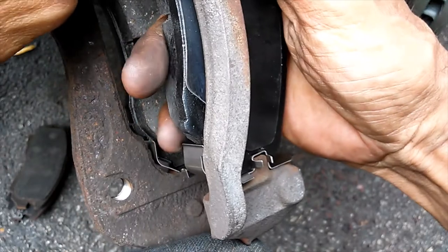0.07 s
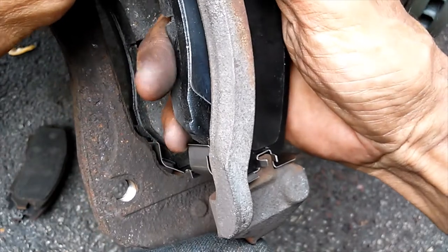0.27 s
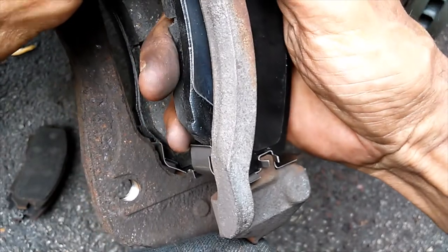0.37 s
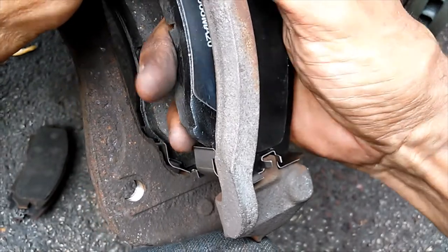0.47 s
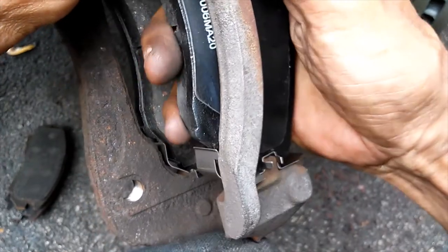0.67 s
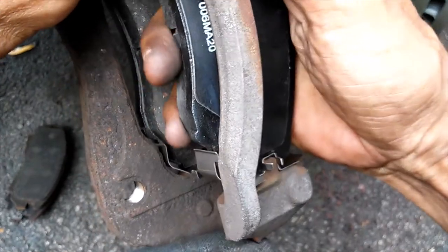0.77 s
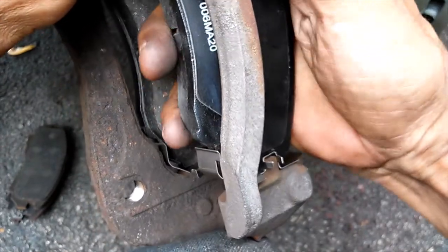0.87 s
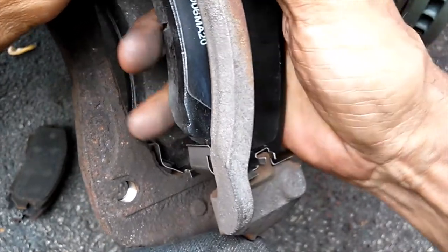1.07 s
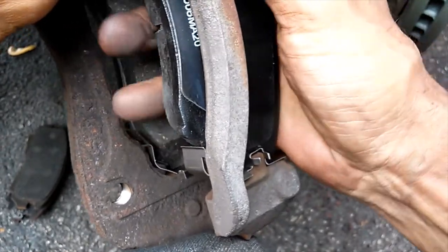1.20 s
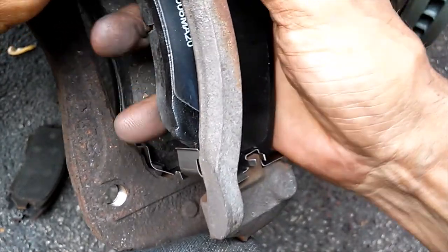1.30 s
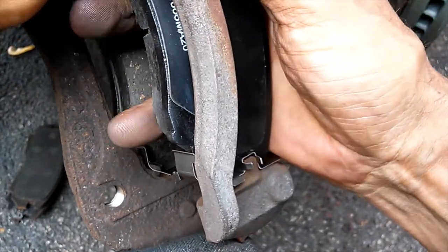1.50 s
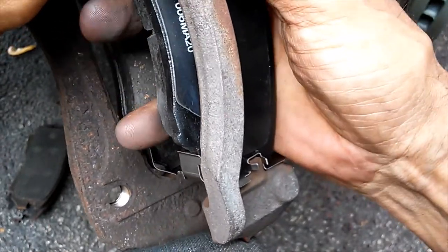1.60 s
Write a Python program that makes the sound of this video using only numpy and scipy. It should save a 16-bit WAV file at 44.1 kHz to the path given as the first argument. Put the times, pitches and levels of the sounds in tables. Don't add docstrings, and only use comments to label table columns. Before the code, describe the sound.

Steel brake pad snapping into a bracket's clips, two bright clacks over low traffic rumble

```python
import sys
import numpy as np
from scipy import signal
from scipy.fft import rfft, irfft, next_fast_len
from scipy.io import wavfile
from scipy.ndimage import uniform_filter1d, map_coordinates

SR = 44100
rng = np.random.default_rng(int(sys.argv[2]) if len(sys.argv) > 2 else 0)


def nominal_scale(level):
    x = np.asarray(level, float) / 20
    return 10 ** x


def bounce(signal):
    frames = np.transpose(np.atleast_2d(signal))
    limited = np.clip(frames, -1, 1)
    pcm = np.round(limited * 32767).astype(np.int16)
    wavfile.write(sys.argv[1], SR, pcm)


N = 72765


def unit(x):
    return x / np.sqrt(np.mean(x ** 2) + 1e-20)


def along(points, hz):
    f, v = np.transpose(points)
    return np.interp(np.log(hz + 1), np.log(f + 1), v)


def curves(rows):
    s, *cols = np.transpose(rows)
    return [np.interp(np.arange(N) / SR, s, c) for c in cols]


def wobble(rate_hz):
    knots = rng.standard_normal(int(N * rate_hz / SR) + 4)
    return map_coordinates(knots, [np.arange(N) * rate_hz / SR])


def filtered(x, response):
    m = next_fast_len(N + SR // 2)
    return irfft(rfft(x, m) * response(np.fft.rfftfreq(m, 1 / SR)), m)[..., :N]


def noise(spectrum):
    return unit(filtered(rng.standard_normal(N), lambda hz: nominal_scale(along(spectrum, hz))))


def patchy(spectrum, patch_db, size):
    z = signal.stft(noise(spectrum), nperseg=size)[2]
    field = uniform_filter1d(rng.standard_normal(z.shape), size=2, axis=0)
    field = uniform_filter1d(field, size=5, axis=1)
    return unit(signal.istft(z * nominal_scale(patch_db * unit(field)), nperseg=size)[1][:N])


def bump(start_s, rise_s, fall_s):
    t = np.arange(N) / SR - start_s
    rise = np.sin(np.pi / 2 * np.clip(t / rise_s, 0, 1)) ** 2
    return rise * nominal_scale(-20 * np.maximum(t - rise_s, 0) / fall_s)


def background():
    # time_s, level_db
    rumble_level = [
        (0.0, -47.5),
        (1.194, -44.5),
        (1.65, -46.5),
    ]
    # freq_hz, density_db_per_hz
    rumble_spectrum = [(12, -55.5), (20, -30), (35, -7), (54, 5), (70, 3), (119, -9.5), (269, -21),
                       (305, -26.5), (420, -30.5), (550, -68.5), (920, -120)]
    # freq_hz, density_db_per_hz
    air_spectrum = [(180, -24), (300, -7.5), (830, -9.5), (903, -12.5), (2900, -21), (4710, -19.5),
                    (14400, -27.5), (15800, -23), (15950, -70)]
    level_db, = curves(rumble_level)
    rumble = nominal_scale(level_db + 3 + 2.0 * wobble(18)) * noise(rumble_spectrum)
    hiss = nominal_scale(-62.5 + 2.7 * wobble(13)) * patchy(air_spectrum, patch_db=2.5, size=256)
    return rumble + hiss


def murmur():
    # freq_hz, density_db_per_hz
    street_spectrum = [(200, -44), (300, -1), (1000, -3), (1300, -19), (1800, -60)]
    return nominal_scale(-68.5) * patchy(street_spectrum, patch_db=6.5, size=1024)


def thumps():
    # start_s, pitch_hz, peak_db, rise_s, t60_s
    knocks = [(0.003, 1018, -62, 0.025, 0.42), (.555, 2450, -79, .03, .4), (.72, 409, -55, 0.026, 0.21),
              (1.346, 1765, -55.5, 0.0036, 0.043), (.68, 554, -52, 0.018, 0.092),
              (.453, 2283, -35, 0.0063, 0.15), (.457, 727, -43.5, 0.0027, .04),
              (.5, 2182, -61, 0.018, 0.14), (1.025, 2340, -59, .01, .07), (1.04, 6200, -58, .012, .07),
              (.12, 63.8, -38.5, 0.036, .2), (.24, 76, -35, .03, .2), (.46, 61.5, -38.5, 0.023, 0.14),
              (.655, 58.5, -32.5, 0.027, 0.12), (.86, 67.9, -36.5, 0.035, .25),
              (1.022, 64.8, -29, 0.016, 0.3), (1.233, 71.7, -27.5, 0.015, 0.27),
              (1.2986, 95, -19, 0.0038, 0.064), (1.311, 96, -16.5, 0.0033, 0.054),
              (1.341, 79.2, -19, 0.006, 0.08), (1.344, 724, -49.5, 0.0031, 0.046)]
    t = np.arange(N) / SR
    out = np.zeros(N)
    for s, hz, db, rise_s, t60_s in knocks:
        out -= nominal_scale(db) * bump(s, rise_s, t60_s / 3) * np.sin(2 * np.pi * hz * (t - s))
    return out


def chatter(contacts, body, crack, modes, body_db, blow_db, crack_db, struck_db, ring_db, wide, band_hz):
    contact_rise_s, contact_t60_s, struck_t60_s, ring_scatter_db = 0.00017, .011, 0.013, 2.5
    life = np.arange(SR // 4) / SR
    rise = 1 - np.exp(-life / contact_rise_s)
    power, out, blows = np.zeros((3, N))
    sway = [0.99 * wobble(150)[:len(life)] for _ in modes]
    for s, db, struck_hz in contacts:
        start = round(s * SR)
        here = slice(start, start + len(life))
        blows[start] = nominal_scale(db + blow_db)
        power[here] += (rise * nominal_scale(db - 60 * life / contact_t60_s)) ** 2
        struck = rise * nominal_scale(db + struck_db - 60 * life / struck_t60_s)
        out[here] += struck * np.sin(2 * np.pi * struck_hz * life)
        for (hz, mode_db, t60_s), turn in zip(modes, sway):
            peak_db = db + ring_db + mode_db + rng.normal(0, ring_scatter_db)
            out[here] += nominal_scale(peak_db - 60 * life / t60_s) * np.sin(2 * np.pi * hz * life + turn - turn[0])
    force = np.sqrt(power)

    def body_response(f):
        total = 0
        for k, (centre, width, db) in enumerate(body):
            damping = 1j * f * width * wide
            total = total + (-1) ** k * nominal_scale(db) * damping / (centre * centre - f * f + damping)
        return total

    grit = nominal_scale(body_db) * force * rng.standard_normal(N)
    out += filtered(blows + grit, body_response)
    out += nominal_scale(crack_db) * force * noise(crack)
    return signal.sosfilt(signal.butter(2, band_hz, "band", fs=SR, output="sos"), out)


def clips():
    # time_s, peak_db, struck_mode_hz
    snap_a = [(.2120, -10, 6450), (.2128, -12, 3100), (.2146, -16, 9300), (.2159, -3, 6450),
              (.2173, -9, 4270), (.2188, -7, 3860), (.2196, -11, 6730), (.2204, -13, 9900),
              (.2212, -15, 4270), (.2236, -13, 4270), (.2268, -22, 6730), (.2285, -23, 4000),
              (.2335, -30, 2300)]
    snap_b = [(.4420, -37, 4800), (.4438, -37, 2290), (.4461, -12, 5900), (.4470, -11, 10400),
              (.4480, -11, 4800), (.4490, -18, 3130), (.4510, -10, 10450), (.4530, -11, 6050),
              (.4544, -9, 6060), (.4552, -15, 2285), (.4560, -13, 10450), (.4570, -17, 4800),
              (.4580, -10, 3450), (.4605, -19, 10500), (.4630, -22, 4200), (.4675, -27, 5340)]
    # freq_hz, width_hz, level_db
    clang_a = [(2495, 34, -12), (2710, 78, -10.5), (4020, 290, -3.5), (4380, 90, -5), (5670, 73, 1),
               (6100, 26, -12), (6740, 140, 1.5), (6730, 50, -1), (8370, 170, -7), (9140, 60, -6),
               (9480, 41, -9), (11266, 120, -21), (14050, 190, -22.5)]
    clang_b = [(2385, 94, -2.5), (3030, 70, -9.5), (3430, 90, -6), (4863, 90, -3.5), (5430, 50, -8),
               (6090, 81, -6), (6450, 49, -8.5), (8010, 70, -6.5), (9300, 70, -4), (9700, 69, -5),
               (10800, 70, -2), (11900, 62, -13.5), (12130, 210, -7)]
    # freq_hz, density_db_per_hz
    crack_a = [(290, -63.5), (500, -50.5), (3150, -14.5), (3920, -3), (5090, -12), (6610, -12), (9630, -8),
               (16000, -32)]
    crack_b = [(240, -73), (400, -51), (2290, -5.5), (3990, -5.5), (6050, -4), (7510, -3.5), (10400, 2),
               (16000, -32.5)]
    # freq_hz, level_db, t60_s
    ring_a = [(2324, -7, 0.06), (4020, -19, 0.12), (4340, -8, .05), (5740, -14, .05), (6445, 0.5, .022),
              (6600, -3, 0.027), (8400, -16, .07), (9600, -16, 0.081), (9880, -14, .07)]
    ring_b = [(1425, -14.5, 0.048), (2096, -33, 0.19), (2283, -6.5, 0.095), (4296, -22.5, 0.18),
              (6000, -16, 0.05), (8490, -18.5, .07), (10240, -18.5, .07), (10500, -7.5, 0.03),
              (12900, -13, .03)]
    # time_s, peak_db, struck_mode_hz
    tick_contacts = [
        (.9272, -51, 907),
        (.9285, -32, 1230),
        (.9308, -39.5, 1420),
        (.9330, -34.5, 1300),
        (.9358, -39, 1626),
        (.944, -46, 1720),
        (.951, -51, 1800),
    ]
    # freq_hz, width_hz, level_db
    tick_body = [(730, 80, -2.5), (1270, 94, 7), (1500, 49, -9), (1652, 45, 4), (2620, 130, -14)]
    tick_crack = [(400, -7), (1300, 10), (3000, -24.0), (5000, -44)]  # freq_hz, density_db_per_hz
    first = chatter(snap_a, clang_a, crack_a, ring_a, body_db=3.5, blow_db=11, crack_db=-8,
                    struck_db=-6, ring_db=-20, wide=2.6, band_hz=(1300, 17000))
    second = chatter(snap_b, clang_b, crack_b, ring_b, body_db=5.0, blow_db=11, crack_db=-10,
                     struck_db=-3.5, ring_db=-20.5, wide=2.6, band_hz=(900, 17000))
    tick = chatter(tick_contacts, tick_body, tick_crack, [], body_db=-4, blow_db=23, crack_db=-2.5,
                   struck_db=-4.5, ring_db=0, wide=1.36, band_hz=(450, 3400))
    return first + second + tick


def yard(x):
    # freq_hz, t60_s
    decay = [(500, 0.42), (3000, 0.12), (9000, 0.12), (15000, 0.29)]
    hz, t, z = signal.stft(rng.standard_normal(SR // 3), SR, nperseg=256)
    tail = signal.istft(z * nominal_scale(-60 * t / along(decay, hz)[:, None]), SR, nperseg=256)[1]
    delayed = np.pad(x, (200, 0))
    return signal.fftconvolve(delayed, tail / np.linalg.norm(tail))[:N]


def fingers():
    # start_s, rise_s, fall_s, peak_db
    scrapes = [
        (.3, 0.054, 0.22, -69.5),
        (1.305, 0.032, .07, -61),
        (1.39, 0.0195, 0.123, -66.5),
    ]
    # freq_hz, density_db_per_hz
    scrape_spectrum = [(3000, -50), (3900, -6), (4300, -2), (5200, -4), (6200, -45)]
    # start_s, rise_s, fall_s, peak_db
    rubs = [(.53, 0.012, 0.028, -60.5), (.71, 0.013, 0.017, -63.5), (0.915, .008, 0.011, -64),
            (.96, 0.034, 0.069, -64), (0.999, 0.041, 0.065, -53.5), (1.07, 0.036, 0.16, -61.5),
            (1.288, 0.01, 0.014, -58.5), (1.309, 0.031, 0.024, -64.5), (1.39, 0.021, 0.094, -71),
            (1.343, 0.0054, 0.044, -56.5), (1.37, 0.0083, 0.02, -51), (1.628, 0.007, 0.015, -68)]
    # freq_hz, density_db_per_hz
    skin = [(880, -38), (1500, -8.5), (2320, -5.5), (3880, -11), (4700, -2.5), (6100, -7), (7460, -6.5),
            (10000, -2.5), (15900, -40)]
    # freq_hz, level_db
    spring = [(1863, -53.5), (4253, -53), (4899, -52), (5378, -53), (8113, -64), (9227, -49.5), (9825, -66),
              (10514, -58)]
    t = np.arange(N) / SR
    strokes = sum(nominal_scale(db) * bump(s, rise_s, fall_s) for s, rise_s, fall_s, db in rubs)
    nail = sum(nominal_scale(db) * bump(s, rise_s, fall_s) for s, rise_s, fall_s, db in scrapes)
    nail = nail * patchy(scrape_spectrum, patch_db=1, size=256)
    top_db = max(db for _, db in spring)
    song = np.zeros(N)
    for hz, db in spring:
        song += nominal_scale(db - top_db + 2.3 * wobble(80.05)) * np.sin(2 * np.pi * (hz * t + rng.random()))
    graze = nominal_scale(-48.5) * bump(start_s=1.35, rise_s=0.026, fall_s=0.0066) * song
    rubbing = strokes * nominal_scale(2.2 * wobble(500)) * patchy(skin, patch_db=3, size=256)
    return rubbing + nail + graze


def squeak():
    # time_s, pitch_hz, level_db
    glide = [
        (0.53, 2370, -78),
        (.55, 2750, -76),
        (.572, 3400, -76),
        (0.586, 3720, -67),
        (.604, 3660, -57),
        (.622, 3670, -60),
        (.645, 3670, -72),
        (.69, 3660, -70),
        (0.76, 3620, -85),
    ]
    jitter, side_hz, side_db = .012, 260, -6
    hz, db = curves(glide)
    turn = 2 * np.pi * np.cumsum(hz * (1 + jitter * wobble(400))) / SR
    below = turn - 2 * np.pi * np.cumsum(side_hz * (1 + 0.1966 * wobble(59))) / SR
    t = np.arange(N) / SR
    on = (t > glide[0][0]) & (t < glide[-1][0])
    tone = nominal_scale(2.2 * wobble(160)) * np.sin(turn)
    side = nominal_scale(side_db + 4.8 * wobble(119)) * np.sin(below)
    return on * nominal_scale(db + 6.5) * (tone + side)


def scene():
    steel = clips()
    close = steel + squeak() + fingers() + thumps()
    return (close + nominal_scale(-15.0) * yard(steel) + background() + murmur())[None]


def band_limit(x):
    return signal.sosfilt(signal.butter(12, 16820, fs=SR, output="sos"), x)


def record(dry):
    top_hz, low_hz = 16750, 30
    mix = filtered(dry, lambda f: (f < top_hz) * f ** 2 / (f ** 2 + low_hz ** 2))
    return band_limit(mix)


dry = scene()
out = record(dry)
bounce(out)
```